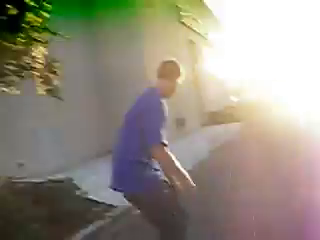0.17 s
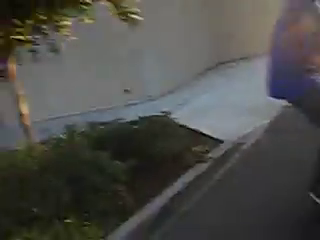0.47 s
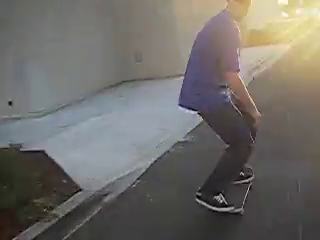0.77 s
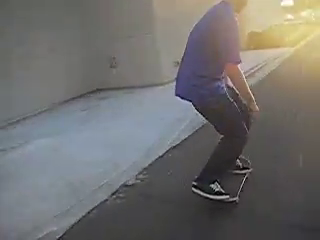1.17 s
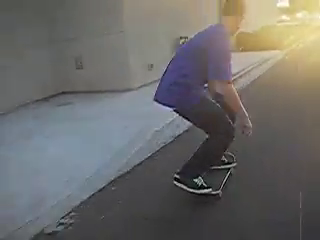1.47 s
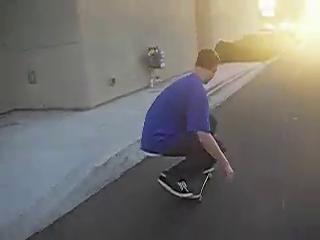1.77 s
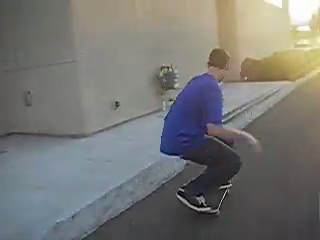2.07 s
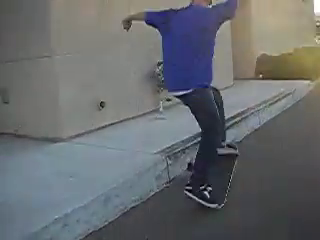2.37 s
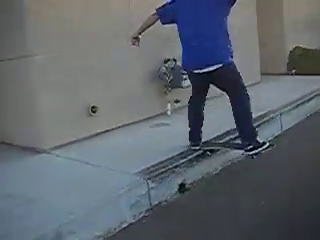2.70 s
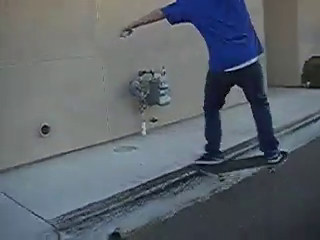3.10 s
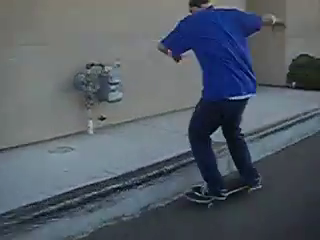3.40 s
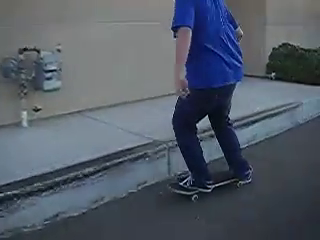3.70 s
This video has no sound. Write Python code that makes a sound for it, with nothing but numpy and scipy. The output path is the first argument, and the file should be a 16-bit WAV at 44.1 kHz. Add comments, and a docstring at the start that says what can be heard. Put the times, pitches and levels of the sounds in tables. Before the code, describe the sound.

Skateboard rolls over rough asphalt with hollow rumble, clacking hard as it hits a curb and lands.

```python
"""A skateboard rolls on rough asphalt beside a wall, close to a small hand-held microphone.
Random impacts of stones excite the resonances of the wooden deck (rumble) and of the hard wheels (grit).
The highest peaks of the deck rumble stand out as short knocks, each a brief burst ringing the deck.
Trucks and wheels clack on a kerb and land again: a sharp touch and a rattle ring wheels and deck.
The holding hand adds soft low thumps; the microphone has a narrow telephone-like band, a steady offset
and limits the highest peaks."""
import sys
import numpy as np
from scipy import signal
from scipy.io import wavfile

SR = 44100
rng = np.random.default_rng(int(sys.argv[2]) if len(sys.argv) > 2 else 0)


def ratio_of_db(decibels):
    """Turn decibels (scalar or array-like) into linear amplitude factors; 0 dB maps to 1."""
    return 10 ** (np.asarray(decibels, float) / 20)


def waveform_to_disk(signal):
    """Save audio, clipped to [-1, 1], as 16-bit WAV at the path in sys.argv[1]."""
    frames = np.transpose(np.atleast_2d(signal))
    scaled = np.clip(frames, -1, 1) * 32767
    samples = np.round(scaled).astype(np.int16)
    wavfile.write(sys.argv[1], SR, samples)


N = 169785  # length [samples]
DECK_BAND_HZ = (164, 1077)
BAND_TOP_HZ = 3363


def rms_one(x):
    """Normalization of the mean power: scales to rms 1."""
    return x / np.sqrt(np.mean(x ** 2) + 1e-20)


def drift(rate_hz):
    """Low-pass filtered noise: two equal poles leave a slow random wander of spread 1."""
    r = np.exp(-2 * np.pi * rate_hz / SR)
    noise = rng.standard_normal(N + SR)
    wander = signal.lfilter([1], [1, -2 * r, r * r], noise)
    return rms_one(wander[SR:])  # the first second lets the filter settle


def resonate(x, hz, width_hz):
    """Damped resonance: a pole pair with about unit gain at its peak."""
    r = np.exp(-np.pi * width_hz / SR)
    zeros = [(1 - r * r) / 2, 0, (r * r - 1) / 2]
    poles = [1, -2 * r * np.cos(2 * np.pi * hz / SR), r * r]
    return signal.lfilter(zeros, poles, x + 1e-18)


def body(x, modes):
    """Modal superposition: resonances in parallel, signs alternating."""
    return sum((-1) ** k * ratio_of_db(db) * resonate(x, hz, width)
               for k, (hz, width, db) in enumerate(modes))


def band(x, hz, kind, order=4):
    """Maximally flat (Butterworth) filtering."""
    return signal.sosfilt(signal.butter(order, hz, kind, fs=SR, output="sos"), x)


def grains(rate, spread_db):
    """Shot noise: random clicks of uneven size and either sign."""
    chance = rng.random(N)
    size = rng.exponential(1, N)
    sign = rng.choice([-1, 1], N)
    return (chance < rate / SR) * ratio_of_db(spread_db * np.minimum(size, 5)) * sign


def shaken(modes, stones_per_s, spread_db, rough, colour_db, upper_db=0):
    """Random excitation of modes: each has its own stream of stones, all swell with the roughness."""
    out = 0
    for hz, width, db in modes:
        level = db + drift(4.7)  # each resonance wanders with a spread of 1 dB
        if 380 < hz < 600:  # the colour lifts the deck's middle resonances
            level = level + colour_db
        if 1600 < hz < 1900:  # and sinks one of the wheels'
            level = level - colour_db
        if 600 < hz < 900:
            level = level + upper_db
        out = out + ratio_of_db(level) * rms_one(resonate(grains(stones_per_s, spread_db), hz, width))
    return out * rough


# resonances of the wooden deck: (frequency [Hz], width [Hz], relative level [dB])
DECK_MODES = [(210, 30, -16), (318, 81, -1), (422, 90, -2.5), (526.2, 75.2, 2), (664.4, 67.5, 0.5),
              (842, 105, -3), (960, 67, -23.5)]


def deck_rumble(rough, colour_db, upper_db):
    """Modal response of the deck to dense stone impacts, at rms 1."""
    deck = shaken(DECK_MODES, 1500, 3, rough, colour_db, upper_db)
    return rms_one(band(deck, DECK_BAND_HZ, "band", order=3))


# resonances of wheels and trucks: (frequency [Hz], width [Hz], relative level [dB])
WHEEL_MODES = [(1150, 480, 10.5), (1475, 180, 5.5), (1750, 250, -12.5), (2084, 140, 2.5), (2330, 100, -1.5),
               (3070, 270, -20.5), (3420, 140, -6.5)]


def wheel_grit(rough, colour_db):
    """Modal response of the wheels to very dense, more uneven impacts, at rms 1."""
    grit = shaken(WHEEL_MODES, 12000, 7, rough, colour_db)
    return rms_one(band(grit, 900, "high", order=2))


# bands of the faint low rumble: (frequency [Hz], relative level [dB])
LOW_BANDS = [(30, -4), (60, -16.5), (100, -9), (150, 19.5)]


def low_rumble(rough):
    """Band-filtered noise: broad low resonances swell with the roughness, at rms 1."""
    low = sum(ratio_of_db(db) * resonate(rng.standard_normal(N), hz, 0.37 * hz) for hz, db in LOW_BANDS)
    return rms_one(low * rough)


# course of the rolling: (time [s], rumble level [dB], grit level re rumble [dB],
#                         colour [dB], gain of the deck's upper resonances [dB])
ROLLING_COURSE = [(.04, -31, -12, -4, 0), (.1, -31, -13, -6, 3), (.17, -28, -10, -8, 4),
                  (.22, -24, -11, -8, 4), (.3, -21, -9, -8, 4), (.37, -21, -12, -8, 4),
                  (.45, -20, -12, -8, 4), (.6, -17, -11, -6, 4), (.7, -17, -8, -6, 4),
                  (.75, -14, -11, -6, 5), (.89, -14, -11, -6, 5), (.94, -23, -11, -2, 2),
                  (1.05, -14, -13, 0, 2), (1.13, -18, -11, 0, 0), (1.19, -12, -17, 0, 0),
                  (1.22, -17, -13, 0, 0), (1.4, -16, -14, 0, -1), (1.7, -15, -13, 0, -2),
                  (2.0, -14, -15, 2, -3), (2.35, -14, -15, 2, -2), (2.55, -16, -15, 0, -1),
                  (2.75, -17, -15, 0, -1), (2.81, -21, -12, 0, 0), (2.92, -17, -16, 0, 0),
                  (2.96, -18, -15, 0, 0), (3.0, -28, -11, 0, 0), (3.08, -27, -14, 0, 0),
                  (3.3, -22, -14, 0, 0), (3.4, -19, -15, 0, 1), (3.58, -17, -16, 0, 1),
                  (3.62, -19, -14, -3, 3), (3.65, -25, -14, -3, 3), (3.72, -23, -17, -3, 3),
                  (3.85, -23, -13, -3, 3)]


def rolling():
    """Roughness excitation: one uneven road drives deck rumble, wheel grit and a faint low floor."""
    times, *columns = np.transpose(ROLLING_COURSE)
    t = np.arange(N) / SR
    level, grit_db, colour_db, upper_db = [np.interp(t, times, c) for c in columns]
    rough = ratio_of_db(0.5 * drift(20))  # spread [dB], rate [Hz]
    deck = deck_rumble(rough, colour_db, upper_db)
    grit = wheel_grit(rough, colour_db)
    low = low_rumble(rough)
    return ratio_of_db(level) * (deck + ratio_of_db(-29) * low + ratio_of_db(grit_db) * grit)


def place(out, s, sound, db):
    """Linear superposition: adds a sound of the given peak level to the track."""
    start = int(s * SR)
    return out + np.pad(ratio_of_db(db) * sound / np.abs(sound).max(), (start, N))[:N]


# dull thumps in the hand that holds the microphone: (time [s], peak level [dB], frequency [Hz])
HAND_THUMPS = [(0.074, -13, 210), (.47, -37, 70), (0.561, -33, 87.7), (0.738, -32.5, 100), (.95, -43, 82),
               (1.085, -25.5, 99), (1.341, -25.5, 70), (2.619, -25.5, 122), (2.76, -33.5, 60),
               (2.965, -29, 70), (3.609, -35.5, 70)]


def thumps():
    """Damped oscillation: a few soft low cycles under a rise-and-decay envelope."""
    out, t = np.zeros(N), np.arange(6000) / SR
    for s, db, hz in HAND_THUMPS:
        x = 6 * t * hz / 2.7  # the envelope scales with the period
        out = place(out, s, x * np.exp(-x) * np.sin(2 * np.pi * hz * t), db)
    return out


# hard clacks of trucks, wheels and tail, before the bass cut:
# (time [s], peak level [dB], ring frequency [Hz], rattle length [s])
CLACK_EVENTS = [(0.228, -14.5, 1400, 0.0071), (0.257, -8.5, 1660, .008), (0.27, -18, 1700, 0.0095),
                (0.283, -6, 1540, 0.0055), (.29, -12, 1665, 0.084), (.297, -7.5, 1660, 0.012),
                (.298, -16, 3066, .004), (0.305, -6, 1650, 0.0059), (0.323, -5.5, 1560, 0.0089),
                (0.339, -11, 1530, 0.008), (0.339, -14.5, 3200, 0.0031), (0.386, -9, 1900, 0.0031),
                (.412, -15.5, 1490, 0.0046), (0.4624, -13.5, 2110, 0.0013), (.463, -10, 3480, 0.0023),
                (0.48, -18.5, 2620, .002), (0.875, -11.5, 1446, 0.024), (.903, -20, 1520, 0.0064),
                (1.344, -18.5, 3600, 0.0069), (1.357, -22, 2424, 0.011), (1.845, -16.5, 1400, 0.011),
                (2.403, -8, 1200, 0.005), (2.7718, -7, 2050, 0.0082), (2.773, -7.5, 3630, 0.0074),
                (2.779, -19, 2550, 0.031), (2.9655, 1, 2320, .0035), (2.9658, -9, 3500, .003),
                (2.9882, 3, 3170, .002), (2.9885, -8, 2300, .002), (2.983, -19, 2380, 0.0043),
                (3.02, -18.5, 3250, 0.0084), (3.088, -26.5, 2200, .005), (3.131, -26, 2200, .005),
                (3.6, -8.5, 1250, 0.014), (3.595, -9.5, 3300, 0.012), (3.604, -7.5, 900, 0.015),
                (3.606, -14, 2100, 0.017), (3.608, -4, 3400, 0.0049), (3.632, -12, 2150, 0.0066)]


def clacks():
    """Impact excitation: touch and rattle ring at one pitch, in wheels and deck; the wall adds a tail."""
    width_hz, tail_db, tail_s = 480, -21.5, 0.031
    out, t = np.zeros(N), np.arange(8000) / SR
    for s, db, hz, length in CLACK_EVENTS:
        rattle = np.exp(-(t / length) ** 2)
        tail = ratio_of_db(tail_db) * np.exp(-t / tail_s)
        shock = rng.standard_normal(8000) * (rattle + tail)
        shock = shock + 5 * (t < 2 / SR)  # sharp first touch
        ring = resonate(resonate(shock, hz, 2 * width_hz), hz, width_hz)
        sound = ring + ratio_of_db(-15) * body(shock, WHEEL_MODES) + ratio_of_db(-9) * body(shock, DECK_MODES)
        out = place(out, s, band(sound, BAND_TOP_HZ, "low"), db)
    return out


# highest peaks of the deck rumble, heard as short knocks, before a common gain and the deck band:
# (time [s], relative peak level [dB], leading ring frequency [Hz])
RUMBLE_PEAKS = [(0.383, -3, 660), (0.411, -6, 680), (0.491, -1.5, 681), (0.523, -5.5, 700),
                (0.581, -2, 640), (0.754, -0.5, 667), (0.779, -3, 527), (0.799, -1, 727), (0.826, -7, 700),
                (0.851, -4.5, 638), (0.868, -2.5, 708), (0.902, 1.5, 600), (1.038, -2.5, 452),
                (1.071, 0, 623), (1.169, -1.5, 473), (1.314, 0, 594), (1.659, -6.5, 401), (1.736, 2, 554),
                (1.784, -4, 505), (2.019, -0.5, 740), (2.259, -3, 616), (2.337, -5, 576), (2.399, -2, 445),
                (2.527, -2, 495), (2.654, -19.5, 685), (2.761, 4, 740), (3.529, -11, 525),
                (3.556, -5.5, 676)]


def rumble_peaks():
    """Impulse response: a pulse and a brief noise burst ring the deck, one resonance leading."""
    decay_s, width_hz, gain_db = .002, 130, -2
    out, t = np.zeros(N), np.arange(2000) / SR
    for s, db, hz in RUMBLE_PEAKS:
        noise = rng.standard_normal(2000)
        burst = noise * np.exp(-t / decay_s)
        burst = burst + 10 * np.sign(noise[0]) * (t < 5 / SR)  # leading pulse
        knock = resonate(burst, hz, width_hz) + ratio_of_db(-6.5) * body(burst, DECK_MODES)
        out = place(out, s, knock, db + gain_db)
    return out


def scene():
    """Superposition of rolling, thumps, rumble peaks in the deck band and clacks after a bass cut."""
    board = band(rumble_peaks(), DECK_BAND_HZ, "band", order=2) + band(clacks(), 140, "high")
    return (rolling() + board + thumps())[None]


def top_cut(x):
    """Nothing passes above the cut-off."""
    return signal.sosfilt(signal.butter(12, 16820, fs=SR, output="sos"), x)


def record(dry):
    """Saturation and band limiting: overload, bass and steep treble cut, offset, late start, limit."""
    input_top, output_top = .68, .707  # full scale = 1
    offset, start_s = -.037, .0364
    x = np.clip(dry, -input_top, input_top)
    x = band(x, 60, "high", order=1)
    x = band(x, BAND_TOP_HZ, "low", order=7)
    x = signal.sosfilt(signal.cheby2(16, 70, 4770, fs=SR, output="sos"), x)  # 70 dB down from 4770 Hz
    x = (x + offset) * (np.arange(N) >= start_s * SR)  # silent before the start
    x = np.clip(x, -output_top, output_top)
    return top_cut(x)


dry = scene()
out = record(dry)
waveform_to_disk(out)
```